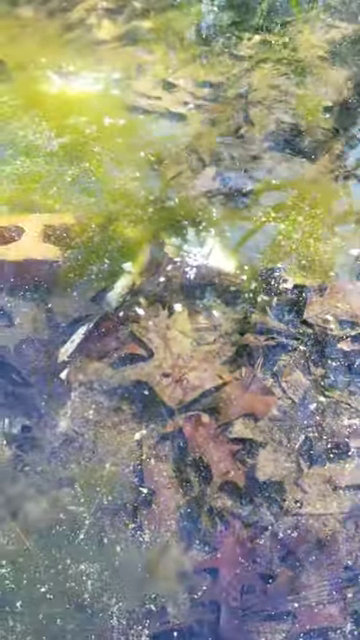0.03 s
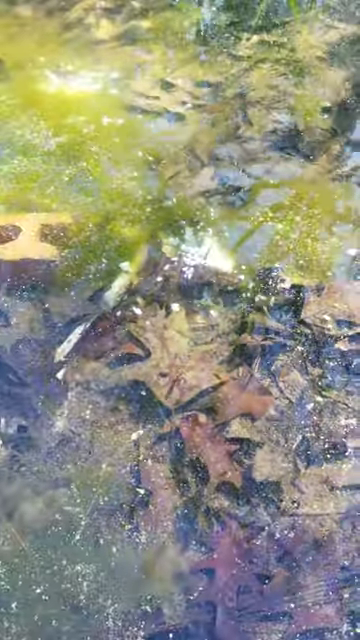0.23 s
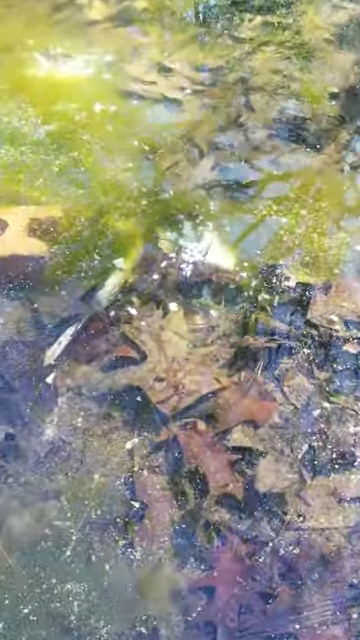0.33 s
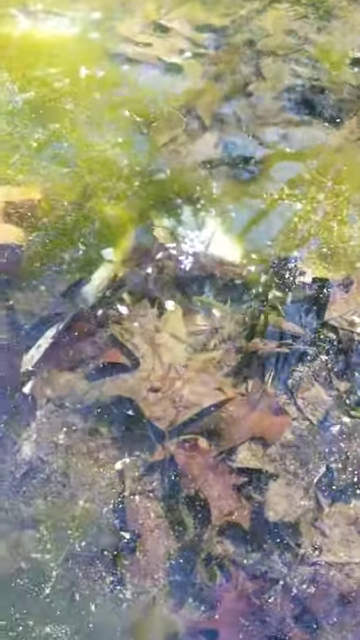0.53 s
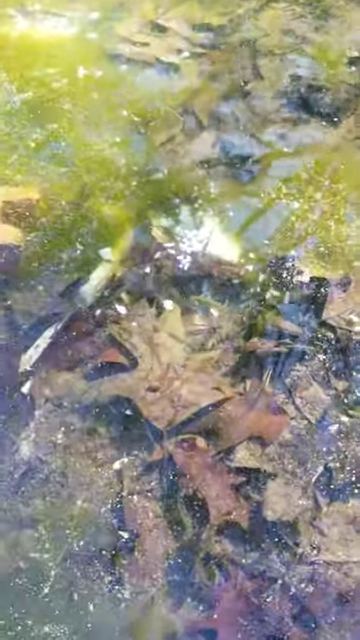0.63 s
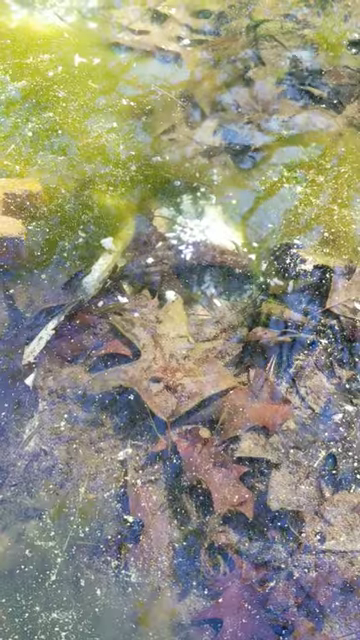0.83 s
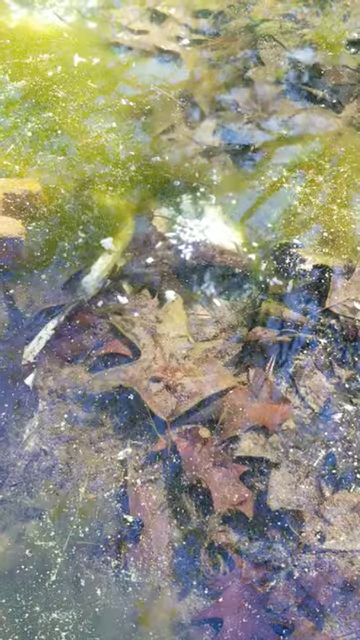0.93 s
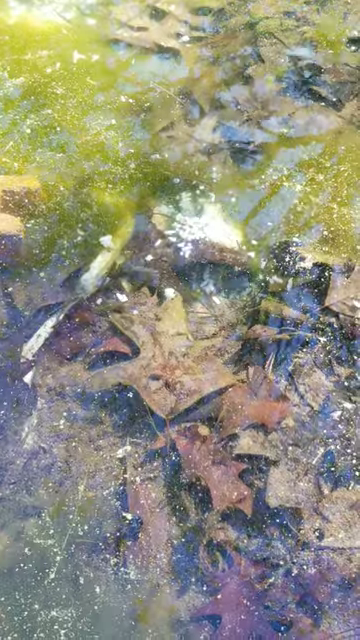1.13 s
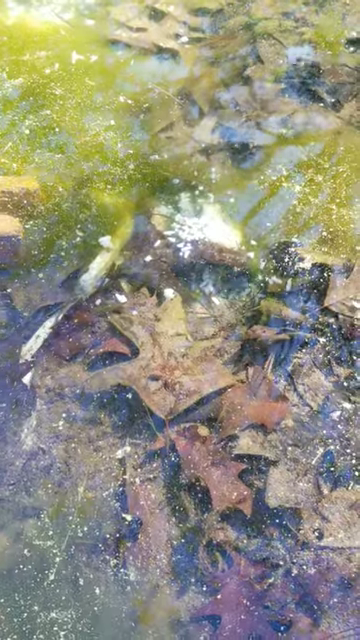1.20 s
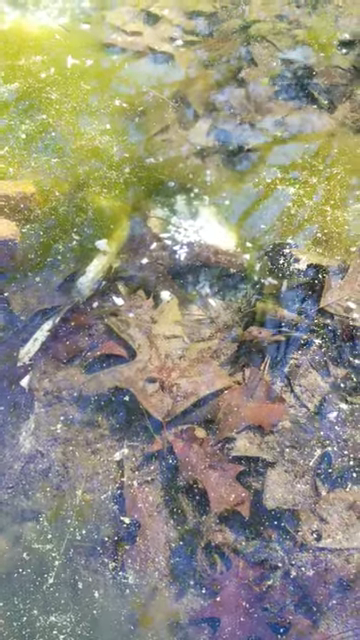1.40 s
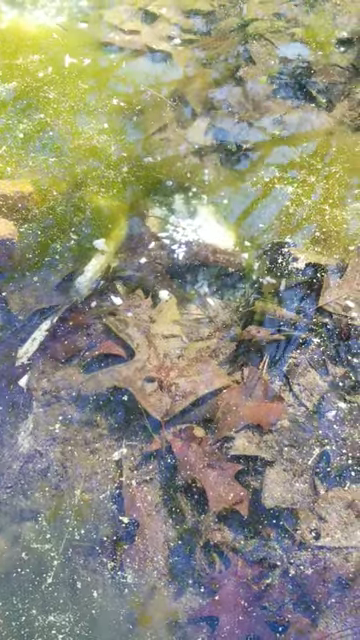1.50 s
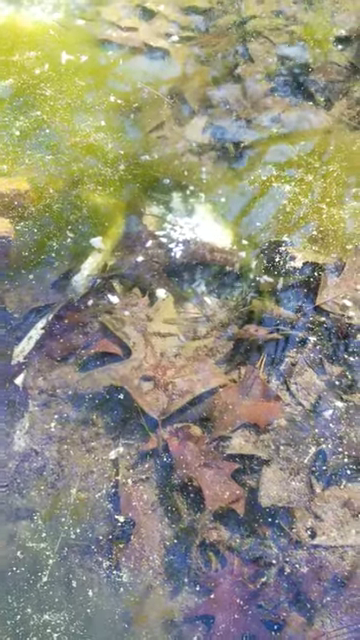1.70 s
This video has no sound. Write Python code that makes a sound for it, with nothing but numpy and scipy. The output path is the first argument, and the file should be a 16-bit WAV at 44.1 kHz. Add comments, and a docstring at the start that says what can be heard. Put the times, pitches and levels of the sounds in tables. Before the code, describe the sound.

A gust rumbles and pops against the microphone, mostly on the left, over faint pond-side air and a soft, swelling hiss. After a split-second dropout, lighter buffeting continues, duller now, along with a low wavering hum.

```python
"""A gust of wind buffets the left port of a microphone, with blunt pops at its height: turbulent flow
makes the pressure at the port fluctuate, and each eddy gives one push and pull. The sheltered right port
gets only a few bumps. Behind lie quiet air over a shallow pond, a far rumble and a soft hiss that swells
early on. After the gust the sound drops out for an instant and returns duller, with a low wavering hum."""
import sys
import numpy as np
from scipy import signal
from scipy.fft import rfft, irfft, next_fast_len
from scipy.io import wavfile
from scipy.ndimage import uniform_filter1d, map_coordinates

SR = 44100
rng = np.random.default_rng(int(sys.argv[2]) if len(sys.argv) > 2 else 0)


def file_out(sig):
    """Save sig as 16-bit WAV at sys.argv[1]."""
    # one column per channel
    cols = np.atleast_2d(sig).T
    # limit, then scale
    lim = np.clip(cols, -1, 1)
    pcm = np.round(lim * 32767).astype(np.int16)
    wavfile.write(sys.argv[1], SR, pcm)


N = 77175

# spectrum of the far rumble (frequency [Hz], relative density [dB])
RUMBLE_SPECTRUM = [(15, -22.5), (30, -5), (60, -10.5), (130, 1), (200, -15.5), (290, -20.5), (400, -30),
                   (700, -69.5), (1500, -99)]
# open air at each port, and its early extra brightness (frequency [Hz], relative density [dB])
AIR_LEFT_SPECTRUM = [(100, 4), (500, 2.5), (680, 0), (880, 9.5), (1150, 8.5), (1500, 7), (1900, -3.5),
                     (2300, -11), (3650, -14.5), (4250, -9), (6100, -16), (7200, -5.5), (8600, -16.5),
                     (11300, -16.5), (12700, -12.5), (15000, -16)]
AIR_RIGHT_SPECTRUM = [(100, -5), (620, -14), (1400, -13.5), (2200, -18.5), (7500, -23), (11000, -21.5),
                      (12700, -17), (14000, -20)]
BRIGHT_SPECTRUM = [(500, -14), (1100, 0), (1750, -2.5), (2200, -12.5), (2600, -15), (3500, -24),
                   (4300, -17), (5800, -23), (7200, -19), (9000, -29.5), (15000, -30.5)]
# swell of the hiss on the left (time [s], level [dB])
HISS_ENVELOPE = [(0, -107), (.14, -75.5), (.29, -67), (.52, -65), (.6, -74.5), (.7, -100)]
# spectrum of the hiss (frequency [Hz], relative density [dB])
HISS_SPECTRUM = [(1500, -14.5), (2400, -3.5), (3300, 4), (4200, 0), (5300, -6), (6300, -1), (7200, 0.5),
                 (8500, -21), (15000, -26)]
# eddies striking a port (time [s], peak before the low cut [dB], width [s], port [0 left, 1 right])
EDDY_IMPACTS = [(.221, -27.5, 0.0031, 0), (0.273, -39, 0.0025, 1), (.326, -36.5, .0018, 0),
                (0.419, -27.5, 0.002, 0), (0.426, -31, 0.0028, 0), (.501, -21, 0.002, 0),
                (.514, -24.5, 0.0012, 0), (.631, -25.5, 0.00086, 0), (.659, -14, .0008, 0),
                (0.6625, -17.5, .0008, 0), (.677, -22, .0014, 0), (0.693, -21, 0.00091, 0),
                (.709, -19.5, 0.0012, 0), (.752, -16, 0.00065, 0), (0.78, -24.5, 0.00068, 0),
                (.790, -28.5, 0.00107, 0), (0.8167, -20.5, .0012, 0), (.913, -24.5, 0.0028, 0),
                (.955, -34, 0.0027, 0), (1.0, -25.5, 0.0016, 0), (1.248, -36.5, 0.0017, 1),
                (1.261, -37.5, 0.00083, 0), (1.269, -33.5, 0.0039, 1), (1.273, -31, 0.0053, 0),
                (1.376, -38.5, 0.0059, 1), (1.47, -29.5, 0.002, 0), (1.51, -34, 0.0028, 0),
                (1.659, -54, 0.0017, 1)]
# strength of the wind at the left port (time [s], level [dB])
WIND_ENVELOPE = [(0, -47), (.18, -46.5), (.224, -38), (.36, -45.5), (.42, -37.5), (.452, -43), (.51, -32),
                 (.545, -38.5), (.6, -33.5), (.66, -20.5), (.75, -24.5), (.82, -26), (.87, -44),
                 (.93, -37.5), (1.05, -41.5), (1.27, -42), (1.33, -55), (1.48, -37), (1.56, -50.5),
                 (1.75, -49.5)]
# buffeting, and the churn that strong wind adds (frequency [Hz], relative density [dB])
BUFFET_SPECTRUM = [(15, -19.5), (45, -13.5), (70, 5.5), (95, 0.5), (130, -4.5), (190, -6.5), (270, -19.5),
                   (400, -40), (700, -54.5), (1500, -87)]
CHURN_SPECTRUM = [(100, -17), (180, -4.5), (330, -0.5), (500, -9.5), (650, -20), (850, -34.5), (1500, -50),
                  (3000, -94)]

RUMBLE_DB, AIR_DB, BRIGHT_DB = (-48.5, -54), (-61.5, -70.5), (-62.5, -80)  # each (left, right)
HUM_HZ, HUM_WANDER_HZ, HUM_WAVER_DB, HUM_DB = 99.7, 2.16, 2, (-44.5, -52.5)
BURST_DB, BURST_WIDTH_S, REFERENCE_EDDY_S = -19, .003, .00097  # level relative to an eddy of this width
LOW_CUT_HZ, TOP_HZ = 29.3, 15500
FULL_WIND_DB, FULL_CHURN_DB, CHURN_SLOPE = -21.5, -39, 1.82  # slope: dB of churn per dB of wind
DROPOUT_S, RETURN_S, FADE_OUT_S, FADE_IN_S, DROPOUT_DB = .832, .8585, .0068, .00065, -42


def amp(db):
    """Amplitude ratio of a level in decibels."""
    return 10 ** (np.asarray(db) / 20)


def unit(x):
    """Normalisation of each channel to rms 1."""
    return x / np.sqrt(np.mean(x ** 2, axis=-1, keepdims=True) + 1e-20)


def seconds():
    """The time of every sample."""
    return np.arange(N) / SR


def curve(rows):
    """Linear interpolation of (time, value) points."""
    return np.interp(seconds(), *np.transpose(rows))


def wobble(rate_hz):
    """Slow random modulation: a spline through rate_hz knots a second."""
    knots = rng.standard_normal(int(N * rate_hz / SR) + 4)
    return map_coordinates(knots, [seconds() * rate_hz])


def filtered(x, response):
    """Linear filtering: the spectrum of x times a frequency response."""
    size = next_fast_len(N + 8192)
    hz = np.fft.rfftfreq(size, 1 / SR)
    return irfft(rfft(x, size) * response(hz), size)[..., :N]


def noise(spectrum):
    """Spectral shaping of white noise, at rms 1."""
    knots_hz, db = np.transpose(spectrum)
    white = rng.standard_normal(N)
    return unit(filtered(white, lambda hz: amp(np.interp(np.log(hz + 1), np.log(knots_hz + 1), db))))


def noise_pair(spectrum, levels_db):
    """Uncorrelated noise at the two ports."""
    return np.array([amp(db) * noise(spectrum) for db in levels_db])


def steady(x, window=1800):
    """Division by the running rms evens out chance swells."""
    power = np.abs(uniform_filter1d(x ** 2, window))
    return unit(x / np.sqrt(power + 1e-6))


def air():
    """Incoherent noises add in power: a steady rush, a far rumble and, until the dropout, more treble."""
    left = amp(AIR_DB[0]) * noise(AIR_LEFT_SPECTRUM)
    right = amp(AIR_DB[1]) * noise(AIR_RIGHT_SPECTRUM)
    rumble = noise_pair(RUMBLE_SPECTRUM, RUMBLE_DB)
    brightness = (seconds() < RETURN_S) * noise_pair(BRIGHT_SPECTRUM, BRIGHT_DB)
    return np.array([left, right]) + rumble + brightness


def hum():
    """Random frequency and amplitude modulation make a low tone waver, from the dropout's end on."""
    hz = HUM_HZ + HUM_WANDER_HZ * wobble(rate_hz=11.9)
    tone = unit(np.sin(2 * np.pi * np.cumsum(hz) / SR))
    gains = np.array([amp(db + HUM_WAVER_DB * wobble(rate_hz=9.85)) for db in HUM_DB])
    return (seconds() > RETURN_S) * gains * tone


def hiss():
    """A slow amplitude envelope makes treble noise swell and fade, mostly on the left."""
    return amp(curve(HISS_ENVELOPE)) * noise_pair(HISS_SPECTRUM, levels_db=(0, -15.5))


def eddies():
    """Each eddy is a bipolar pressure pulse on a port; the tight ones also stir up a burst of churn."""
    pressure = np.zeros((2, N))
    churn = steady(noise(CHURN_SPECTRUM), window=300)
    for time_s, db, width_s, port in EDDY_IMPACTS:
        t = seconds() - time_s
        pulse = -t / width_s * np.exp((1 - (t / width_s) ** 2) / 2)  # derivative of a Gaussian, peak 1
        tightness = REFERENCE_EDDY_S / width_s
        burst = amp(BURST_DB) * tightness ** 3 * np.exp(-(t / BURST_WIDTH_S) ** 2 / 2)
        pressure[int(port)] += amp(db) * (pulse + burst * churn)
    # the port passes no slow pressure change
    low_cut = signal.butter(2, LOW_CUT_HZ, "high", fs=SR, output="sos")
    return signal.sosfilt(low_cut, pressure)


def wind():
    """Turbulent pressure buffets the left port; the higher churn grows faster, by a power law."""
    strength_db = curve(WIND_ENVELOPE) + wobble(rate_hz=40.15)  # random lumps of about 1 dB
    buffet = amp(strength_db) * steady(noise(BUFFET_SPECTRUM))
    churn_db = FULL_CHURN_DB + CHURN_SLOPE * (strength_db - FULL_WIND_DB)
    churn = amp(churn_db) * steady(noise(CHURN_SPECTRUM))
    return np.array([buffet + churn, np.zeros(N)])


def scene():
    """Superposition of the wind at the ports and the quiet surroundings."""
    return wind() + eddies() + air() + hiss() + hum()


def record(dry):
    """Gating gives an instant of near silence; band limiting removes the highest treble."""
    t = seconds()
    fade_out = np.clip((DROPOUT_S - t) / FADE_OUT_S, 0, 1)
    fade_in = np.clip((t - RETURN_S) / FADE_IN_S, 0, 1)
    gate = np.maximum(fade_out + fade_in, amp(DROPOUT_DB))
    end_fades = np.clip(np.minimum(t, t[-1] - t) / .003, 0, 1)
    return filtered(dry * end_fades * gate, lambda hz: hz < TOP_HZ)


dry = scene()
out = record(dry)
file_out(out)
```